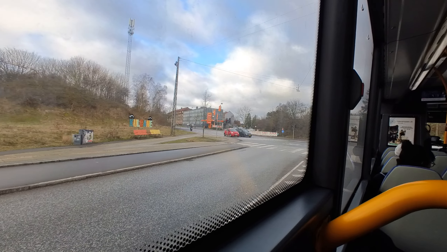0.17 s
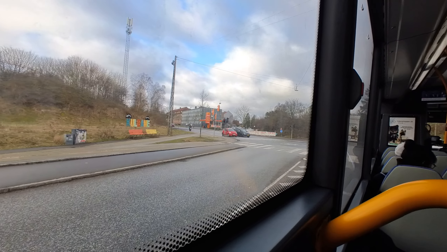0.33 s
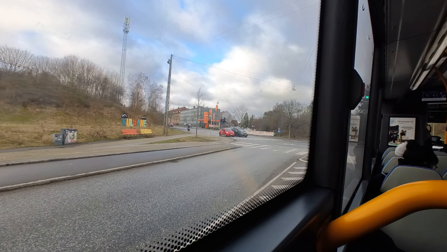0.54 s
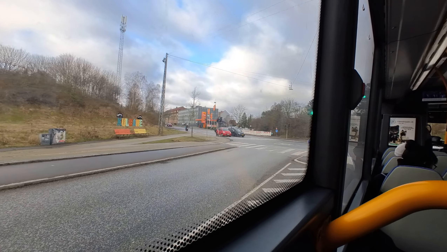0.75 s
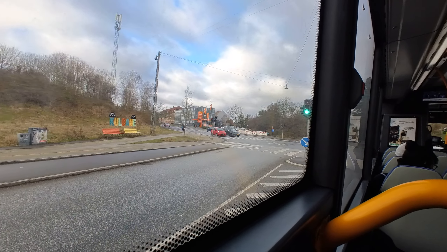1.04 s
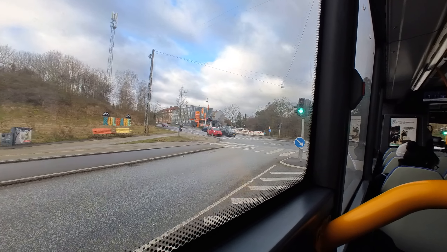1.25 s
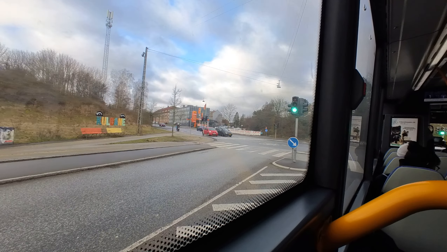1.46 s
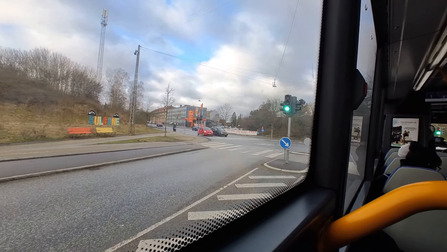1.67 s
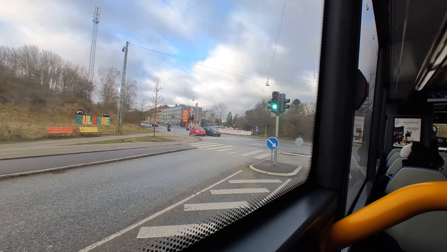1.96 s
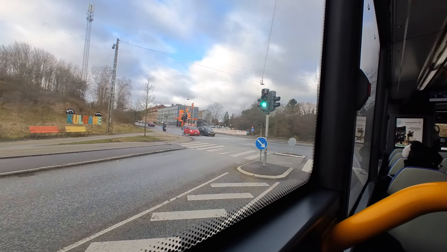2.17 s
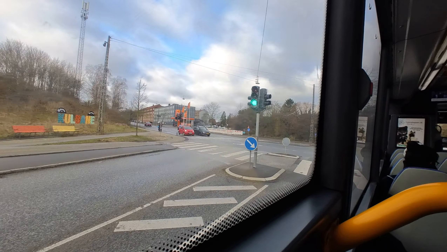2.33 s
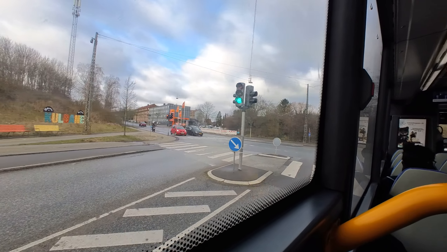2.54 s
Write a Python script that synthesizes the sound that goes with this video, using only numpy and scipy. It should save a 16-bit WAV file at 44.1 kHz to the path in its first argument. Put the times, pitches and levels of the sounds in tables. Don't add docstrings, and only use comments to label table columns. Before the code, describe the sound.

Diesel bus engine and road rumble, heard in stereo inside the cabin. It coasts at low, booming revs with a faint fan hum and soft tyre hiss. At 0.15 s a bump thumps the body, with sharp ticks, panel knocks and rattling trim; another jolt follows at 0.35 s. From 1.05 s the engine surges, whining slightly, with lighter rattles until 1.8 s; higher revs settle into cruising by 2.5 s.

```python
import sys
import numpy as np
from scipy import signal
from scipy.fft import rfft, irfft, next_fast_len
from scipy.io import wavfile
from scipy.ndimage import map_coordinates

SR = 44100
rng = np.random.default_rng(int(sys.argv[2]) if len(sys.argv) > 2 else 0)


def master_out(mix):
    frames = np.transpose(np.atleast_2d(mix))
    ceiling = np.clip(frames, -1, 1)
    pcm = np.round(ceiling * 32767).astype(np.int16)
    wavfile.write(sys.argv[1], SR, pcm)


def voltage_ratio(level):
    return 10 ** (np.asarray(level, float) / 20)


N = 119070

# time_s, level_db
RUMBLE_LEVEL = [(0, -25), (.3, -24.5), (.6, -26.5), (1.1, -26), (1.5, -25), (2.1, -25.5), (2.7, -24.5)]
# freq_hz, density_db_per_hz
RUMBLE_COLOUR = [(20, -1), (60, -3.5), (140, -2), (270, -4.5), (340, -9.5), (520, -13), (850, -19),
                 (1100, -38)]
# freq_hz, density_db_per_hz
HISS_COLOUR = [(850, -3.5), (1050, -2), (1600, -1.5), (2600, -5.5), (3600, -20.5), (6300, -23), (8500, -37),
               (12500, -56.5)]
# freq_hz, likeness_0_to_1
LIKENESS = [(60, 0.97), (250, 0.99), (500, .95), (1000, 0.88), (2000, 0.53), (4000, 0.044), (8000, 0.12),
            (13000, 0.45)]
# centre_s, level_db, swing_hz, half_length_s
SWINGS = [
    (0.175, -16.5, 67.4, 0.032),
    (0.238, -15.5, 33, 0.022),
    (1.299, -28, 82, 0.013),
    (1.402, -27, 37, 0.033),
    (1.544, -24.5, 45.8, 0.018),
    (1.674, -29, 47.5, 0.096),
]
# time_s, level_db
BUZZ_LEVEL = [(0, -47.5), (.1, -65), (.42, -56), (.7, -71.5), (1.1, -60.5), (1.4, -61), (1.72, -60),
              (2.02, -51), (2.15, -58.5), (2.3, -52.5), (2.5, -68), (2.7, -63.5)]
# freq_hz, density_db_per_hz
TRIM_COLOUR = [(1500, -8.5), (3000, -3.5), (4000, -6.5), (5000, -7.5), (7500, -7.5), (9300, -18.5),
               (13500, -28), (15500, -40.5)]
# peak_s, level_db, rise_s, t60_s, tilt_db_per_octave
RATTLE_BURSTS = [(.03, -59, 0.023, .25, -4), (0.149, -33.5, 0.0024, 0.27, -8.5),
                 (.315, -42, 0.0036, 0.14, 5.5), (0.35, -41, .014, 0.16, -3.5),
                 (0.369, -41, 0.0025, 0.11, 0.5), (1.107, -50.5, 0.022, 0.17, -2),
                 (1.243, -57, 0.0097, 0.15, 4.5), (1.281, -40, .011, 0.2, 0.5),
                 (1.345, -51, 0.024, 0.23, -3.5), (1.515, -42, 0.012, .16, -2),
                 (1.592, -42.5, 0.033, 0.18, 1), (1.808, -56, 0.019, 0.088, 1),
                 (1.928, -64.5, 0.0089, 0.098, 8.5), (2.4185, -53, 0.00053, 0.012, 7)]
# start_s, peak_db, pitch_hz
CONTACTS = [(0.1462, -28, 2920), (0.1468, -31, 1500), (0.147, -35.5, 5510), (0.1472, -20, 2410),
            (0.1518, -24, 4950), (0.1528, -25, 2730), (0.1574, -36, 4220), (0.1592, -29, 1740),
            (0.1626, -40, 5060), (0.1649, -30, 1790), (0.1688, -43, 5170), (0.1699, -35, 1770),
            (0.1735, -39, 4840), (0.1748, -34, 1680), (0.181, -41, 5150), (0.1837, -33, 2090),
            (0.1917, -44, 5320), (0.3139, -44, 4740), (0.3261, -41, 7770), (0.3269, -33, 2130),
            (0.3402, -30, 1680), (0.3463, -42, 4800), (0.3552, -36, 4290), (0.3617, -43, 4180),
            (0.3635, -25, 1850), (0.3679, -39, 6460), (0.3683, -31, 2150), (0.3728, -26, 1720),
            (0.3775, -33, 1680), (0.3851, -44, 4460), (0.388, -33, 1720), (0.403, -31, 1830),
            (1.1101, -44, 4180), (1.2674, -41, 5840), (1.2778, -38.5, 4820), (1.2875, -39, 4970),
            (1.2961, -43, 4590), (1.3281, -44, 4670), (1.5144, -41, 6440), (1.523, -44, 4030),
            (1.5285, -41, 3790), (1.5513, -44, 4970), (1.5656, -44, 4370), (1.5724, -42, 4690),
            (1.5778, -42, 4800), (1.5847, -38, 4910), (1.5873, -33, 1700), (1.5909, -39, 5250),
            (1.5957, -42, 6350), (1.798, -34, 2100), (2.316, -34.5, 2260)]
# peak_s, level_db, centre_hz, rise_s, t60_s
PANEL_KNOCKS = [(0.147, -30.5, 2490, 0.0012, 0.16), (0.15, -35.5, 700, 0.003, 0.13),
                (.16, -37.5, 883, 0.0072, 0.17), (0.149, -33, 1330, 0.002, 0.16),
                (0.175, -24, 478, 0.014, 0.13), (0.169, -25.5, 240, 0.017, .26),
                (.268, -33.5, 758, 0.022, 0.13), (.312, -31.5, 500, 0.02, 0.2),
                (.33, -43, 2300, 0.02, 0.35), (.36, -42, 1200, .03, .3), (.42, -39, 1980, 0.027, 0.23),
                (.375, -39, 950, 0.015, 0.13), (.77, -39, 490, 0.027, 0.22),
                (.366, -27.5, 535, 0.024, 0.085), (.396, -26, 330, 0.0217, 0.14),
                (0.44, -31.5, 420, 0.028, 0.15), (.79, -29, 253, 0.074, 0.13),
                (1.3, -35.5, 543, 0.015, 0.24), (1.308, -44, 1260, 0.02, .15),
                (1.549, -38.5, 2630, .011, .1), (1.593, -41, 2060, 0.025, 0.27),
                (1.798, -37, 2120, 0.0052, 0.039), (1.817, -43, 2740, .009, 0.077),
                (2.005, -40, 1900, 0.023, 0.27), (2.068, -34, 280, 0.034, 0.75),
                (2.319, -41.5, 2280, 0.0067, 0.17), (.57, -42, 905, .08, .3), (1.12, -33, 270, .07, .6),
                (.172, -25, 350, .018, .15), (.05, -23.5, 145, 0.027, 0.32)]
# time_s, level_db
FAN_LEVEL = [(0, -36), (.6, -35), (1, -37), (1.4, -39), (1.8, -37), (2.05, -40), (2.25, -46), (2.7, -44)]
# time_s, level_db
WHINE_LEVEL = [(0, -62), (.55, -50), (.85, -62), (1.15, -49), (1.35, -48.5), (1.55, -50), (1.75, -54),
               (1.95, -64), (2.7, -57)]
# time_s, cycle_rate_hz, stage (0 coasting, 1 surging, 2 pulling, 3 cruising)
ENGINE_RUN = [
    (0, 8.21, 0),
    (.5, 8.26, 0),
    (1.05, 8.21, .05),
    (1.35, 8.92, .6),
    (1.5, 9.31, 1),
    (1.65, 9.74, 1),
    (1.95, 10.14, 1.8),
    (2.25, 10.36, 2.2),
    (2.5, 10.58, 3),
    (2.7, 10.76, 3),
]
# order_per_cycle, coasting_db, surging_db, pulling_db, cruising_db
ORDER_LEVELS = [(4, -45, -33, -33, -37), (5, -45, -32, -45, -45), (6, -27, -35, -33, -32),
                (7, -45, -45, -39, -39), (8, -45, -44, -36, -44), (9, -35, -26, -23, -31),
                (10, -34, -22, -28, -27), (11, -45, -45, -38, -30), (12, -35, -23, -32, -45),
                (13, -45, -45, -42, -45), (14, -43, -34, -30, -32), (15, -45, -33, -32, -33),
                (16, -31, -33, -45, -33), (17, -45, -45, -28, -37), (18, -31, -45, -38, -31),
                (19, -45, -36, -45, -39), (20, -45, -42, -35, -45), (21, -45, -36, -43, -42),
                (24, -60, -47, -38, -37), (25, -48, -60, -60, -43), (27, -50, -40, -36, -40),
                (28, -60, -60, -40, -43), (33, -60, -60, -55, -51), (36, -45, -60, -41, -55),
                (38, -60, -44, -41, -41), (40, -49, -60, -45, -48), (50, -60, -60, -44, -60),
                (54, -60, -59, -50, -55)]
PORT_CENTRE_HZ = 4950, 10900
PORT_BANDWIDTH_HZ = (520, 860)
PORT_BOOST = (1.2, 0.39)
# freq_hz, difference_db
LEFT_OVER_RIGHT = [(60, 0), (500, .3), (2000, 1), (4500, -.8), (9000, .5)]


def unit(x):
    return x / np.sqrt(np.mean(x ** 2) + 1e-20)


def along(points, hz):
    f, v = np.transpose(points)
    return np.interp(np.log(hz + 1), np.log(f + 1), v)


def curves(rows):
    s, *cols = np.transpose(rows)
    return [np.interp(np.arange(N) / SR, s, c) for c in cols]


def wobble(rate_hz):
    knots = rng.standard_normal(int(N * 40 / SR) + 4)
    return map_coordinates(knots, [np.arange(N) * rate_hz / SR])


def filtered(x, response):
    length = x.shape[-1]
    m = next_fast_len(length + 8192)
    return irfft(rfft(x, m) * response(np.fft.rfftfreq(m, 1 / SR)), m)[..., :length]


def peak(hz, centre_hz, width_hz):
    damping = hz * width_hz
    return damping / np.sqrt((centre_hz ** 2 - hz ** 2) ** 2 + damping ** 2)


def likeness_angle(hz):
    return np.arccos(np.clip(along(LIKENESS, hz), 0, 1))


def spread(pair, gain, apart=1):
    def mid_side_gain(hz):
        turn = likeness_angle(hz) / 2 * apart
        return gain(hz) * np.array([np.cos(turn), np.sin(turn)])
    mid, side = filtered(pair, mid_side_gain)
    return unit(np.array([mid + side, mid - side]))


def grit(size):
    grains_per_s, grain_db = 1300, 2
    grain = (np.arange(size) * grains_per_s / SR).astype(int)
    force = rng.exponential(size=size // 8 + 2)[grain]
    return rng.standard_normal((2, size)) * voltage_ratio(grain_db * np.minimum(force, 4))


def burst(out, peak_s, level_db, rise_s, t60_s, gain, ring_hz=0):
    size = SR // 2
    t = np.arange(size) / SR - .1
    shape = np.where(t < 0, np.exp(-(t / rise_s) ** 2), voltage_ratio(-60 * np.abs(t) / t60_s))
    shape = shape * signal.windows.tukey(size, .15)
    ring_share = .88 * (ring_hz > 0)
    noise = np.sqrt(1 - ring_share) * spread(grit(size), gain, apart=0.94)
    ring = np.sqrt(2 * ring_share) * np.sin(2 * np.pi * ring_hz * t)
    placed = np.pad(voltage_ratio(level_db) * shape * (noise + ring), ((0, 0), (round(peak_s * SR), N)))
    return out + placed[:, SR // 10:SR // 10 + N]


def road():
    level_db, = curves(RUMBLE_LEVEL)

    def rumble_gain(hz):
        return voltage_ratio(along(RUMBLE_COLOUR + [(2500, -78.0), (9000, -140)], hz)) * (hz > 15)

    def hiss_gain(hz):
        return voltage_ratio(along([(300, -50.0)] + HISS_COLOUR + [(14000, -85)], hz))

    rumble = spread(rng.standard_normal((2, N)), rumble_gain)
    hiss = spread(rng.standard_normal((2, N)), hiss_gain)
    waver_db = .55 * (wobble(8.91) + 2 * wobble(22.02))
    hiss_db = -42.5 + level_db - level_db.min() + waver_db
    return voltage_ratio(level_db + 0.34 * wobble(5.5)) * rumble + voltage_ratio(hiss_db) * hiss


def suspension():
    t = np.arange(N) / SR
    out = np.zeros(N)
    for s, db, hz, half_s in SWINGS:
        out += voltage_ratio(db + 4) * np.exp(-((t - s) / half_s) ** 2) * np.cos(2 * np.pi * hz * (t - s))
    return out


def trim():
    def colour(tilt_db):
        def gain(hz):
            spectrum_db = along([(400, -35.5)] + TRIM_COLOUR + [(17000, -88.5)], hz)
            return voltage_ratio(spectrum_db + tilt_db * np.log2(hz / 5000 + 0.14))
        return gain

    buzz_db = curves(BUZZ_LEVEL)[0] + 1.3 * wobble(18)
    out = voltage_ratio(buzz_db) * spread(grit(N), colour(0.88))
    for s, db, rise_s, t60_s, tilt_db in RATTLE_BURSTS:
        out = burst(out, s, db, rise_s, t60_s, colour(tilt_db))
    return out


def ticks():
    rise_s, cycles_to_60_db = 0.00035, 30
    out, t = np.zeros((2, N)), np.arange(SR // 20) / SR
    for s, db, hz in CONTACTS:
        lead_rad = rng.uniform(-.6, .6) * likeness_angle(hz) * np.array([[1], [-1]])
        peak_db = db + 2.5 - 1.5 * np.log2(hz / 2000)
        shape = voltage_ratio(peak_db - 60 * t * hz / cycles_to_60_db) * (1 - np.exp(-t / rise_s))
        start = round(s * SR)
        out[:, start:start + len(t)] += shape * np.sin(2 * np.pi * hz * t + lead_rad)
    return out


def panels():
    out = np.zeros((2, N))
    for s, db, hz, rise_s, t60_s in PANEL_KNOCKS:
        big = hz < 1000
        width_hz = hz / (5.8 if big else 2.2)
        out = burst(out, s, db, rise_s, t60_s, lambda f: peak(f, hz, width_hz) ** 2, ring_hz=hz * big)
    return out


def fan():
    level_db = curves(FAN_LEVEL)[0] + 2.6 * wobble(14)
    phase = 2 * np.pi * 364.1 * np.arange(N) / SR + .6 * wobble(8.95)
    return np.sqrt(2) * voltage_ratio(level_db) * np.sin(phase)


def gear(cycles):
    level_db = curves(WHINE_LEVEL)[0] + 3 * wobble(14.4)
    phase = 2 * np.pi * 146 * cycles + .35 * wobble(30)
    return np.sqrt(2) * voltage_ratio(level_db) * np.sin(phase)


def engine():
    rate_hz, stage = curves(ENGINE_RUN)
    cycles, out = np.cumsum(rate_hz) / SR, np.zeros(N)
    for order, *levels_db in ORDER_LEVELS:
        level = np.interp(stage, np.arange(len(levels_db)), voltage_ratio(levels_db))
        drift = voltage_ratio(1.1 * wobble(3.684))
        phase = 2 * np.pi * (order * cycles + rng.random()) + .3 * wobble(4.616)
        out += level * drift * np.sin(phase)
    return np.sqrt(2) * out + gear(cycles)


def scene():
    return road() + suspension() + trim() + ticks() + panels() + fan() + engine()


def low_pass(x):
    return signal.sosfilt(signal.butter(12, 15750, fs=SR, output="sos"), x)


def record(dry):
    def port_gain(hz):
        gain = 1
        for centre_hz, width_hz, boost in zip(PORT_CENTRE_HZ, PORT_BANDWIDTH_HZ, PORT_BOOST):
            gain = gain + boost * peak(hz, centre_hz, width_hz) ** 2
        return gain * voltage_ratio(along(LEFT_OVER_RIGHT, hz) * np.array([[.5], [-.5]]))
    return low_pass(filtered(dry, port_gain))


dry = scene()
out = record(dry)
master_out(out)
```